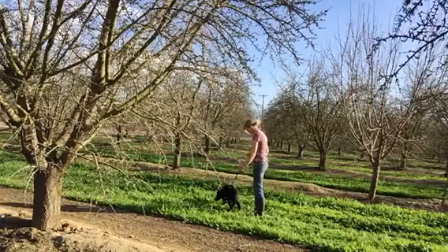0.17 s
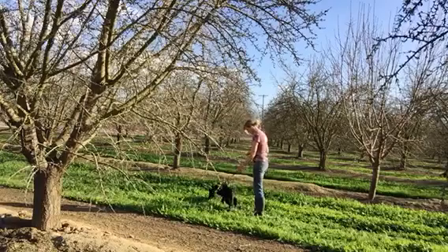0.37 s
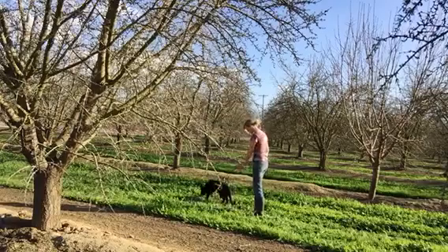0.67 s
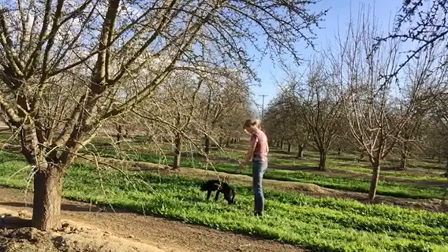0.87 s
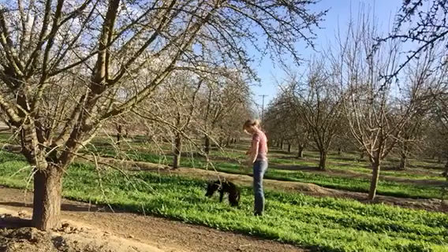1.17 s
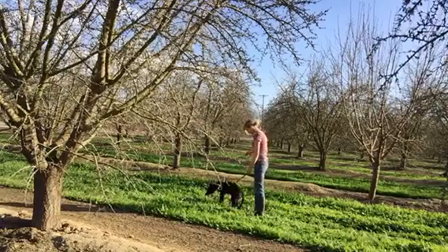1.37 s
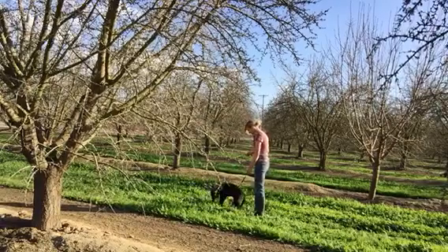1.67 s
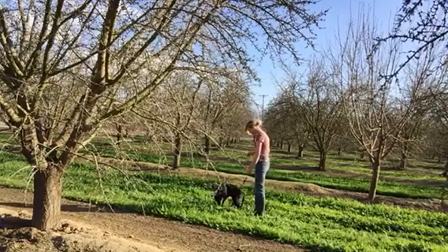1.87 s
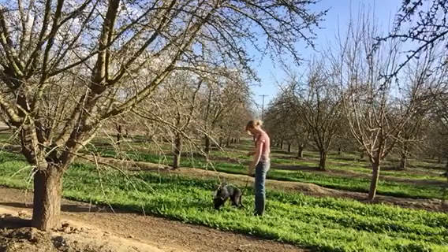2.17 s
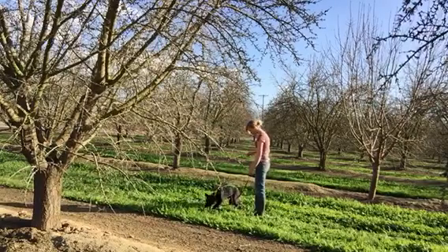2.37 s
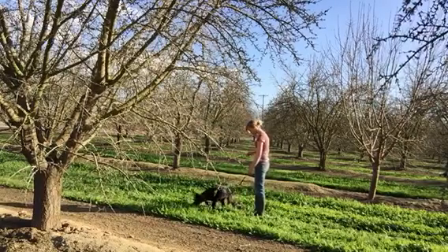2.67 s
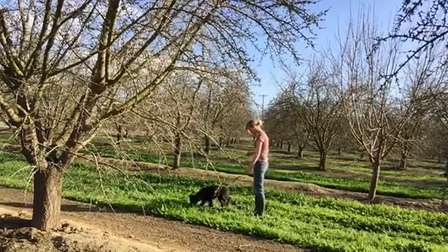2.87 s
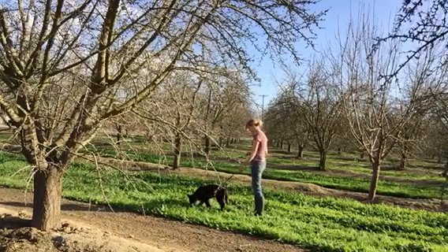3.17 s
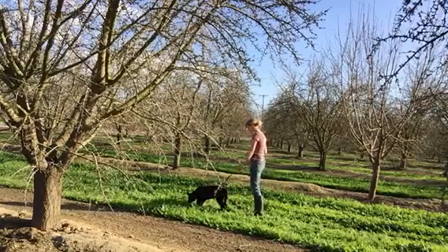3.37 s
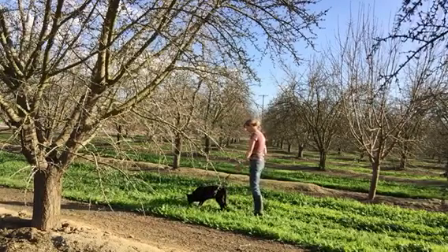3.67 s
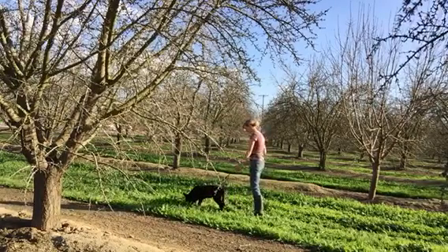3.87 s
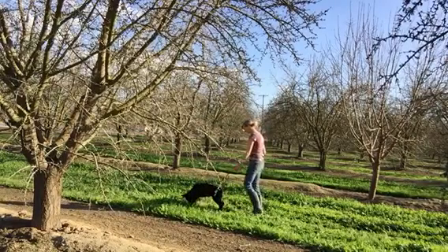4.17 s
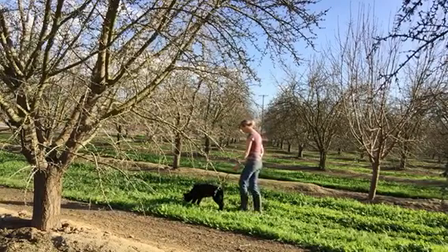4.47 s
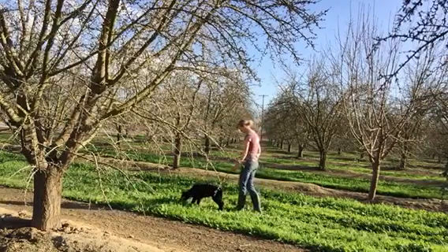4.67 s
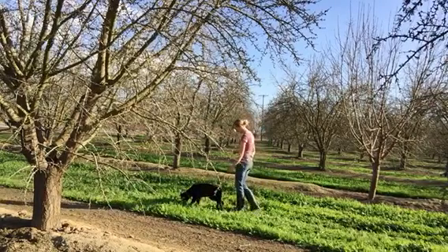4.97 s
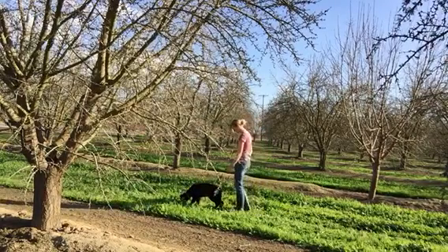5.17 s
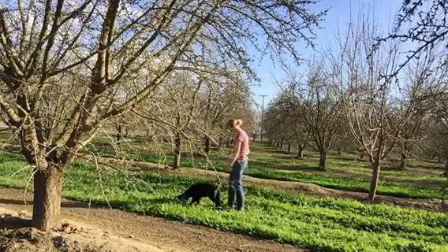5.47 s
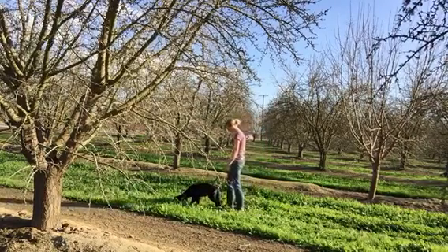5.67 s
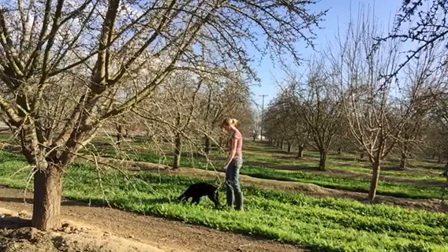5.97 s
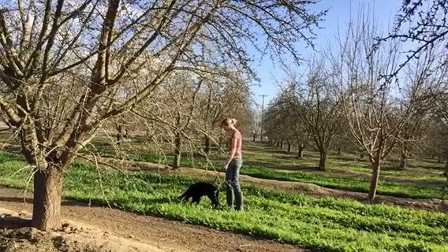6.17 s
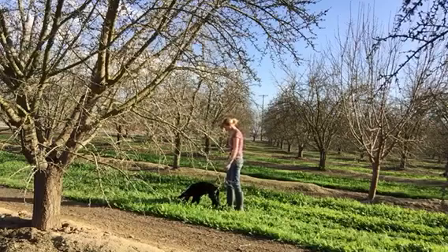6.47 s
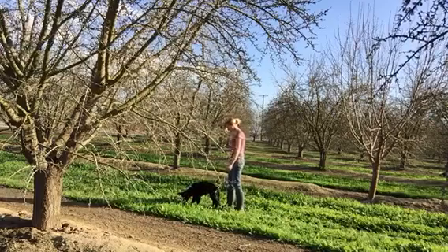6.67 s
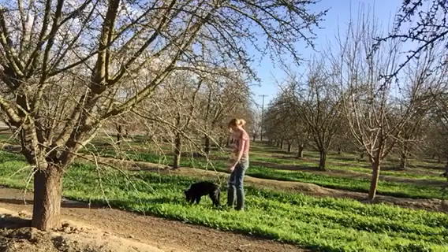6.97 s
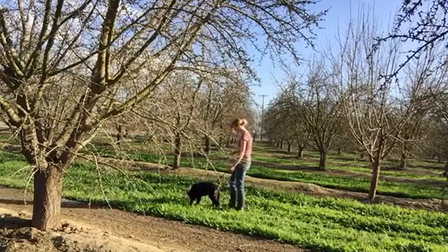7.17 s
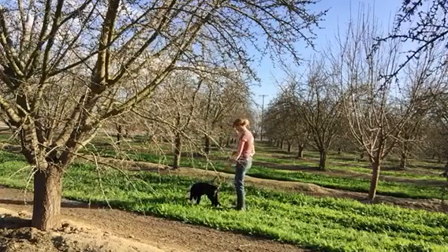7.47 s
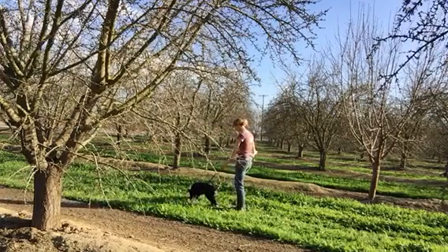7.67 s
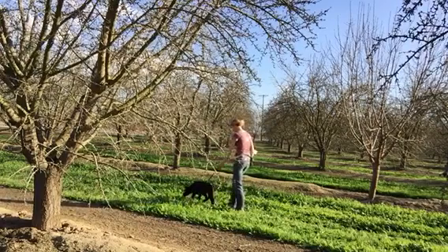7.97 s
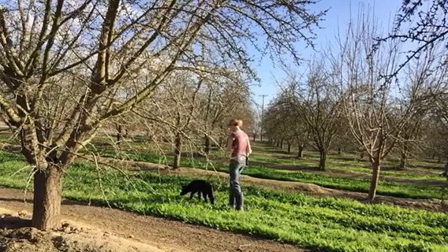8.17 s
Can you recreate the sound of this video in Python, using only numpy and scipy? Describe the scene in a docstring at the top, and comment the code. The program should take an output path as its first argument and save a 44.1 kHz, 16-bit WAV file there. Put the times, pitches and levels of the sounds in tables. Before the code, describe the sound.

Deep exhaust hum of a passing vehicle rises, shifts down in pitch, washes by with tyre roar, and recedes over faint outdoor air.

```python
"""An orchard, with an eight-cylinder vehicle driving past some way off: sines locked to the firing rate make
its exhaust drone, which drops in pitch at a gear change, as it passes, and at a second change near the end.
Coloured noise makes the exhaust gas, tyres and rumbling wake, which swell and slowly fade; a moving filter
hollows the vehicle's sound as its ground reflection does. Over steady faint air noise, short swishes of noise
rustle in the grass and gliding sines chirp like small birds far away."""
import sys
import numpy as np
from scipy import signal
from scipy.fft import rfft, irfft, next_fast_len
from scipy.io import wavfile

SR = 44100
rng = np.random.default_rng(int(sys.argv[2]) if len(sys.argv) > 2 else 0)


def generate_wav(sig):
    """Save sig (samples, or channels by samples) to the path in sys.argv[1] as 16-bit PCM at SR."""
    pcm = np.round(np.clip(np.atleast_2d(sig).T, -1, 1) * 32767).astype(np.int16)
    wavfile.write(sys.argv[1], SR, pcm)


N = 366206
TIME = np.arange(N) / SR


def from_db(db):
    """Decibels to gain."""
    return 10 ** (np.asarray(db) / 20)


def rms_one(x):
    """Scale to unit rms."""
    return x / np.sqrt(np.mean(x ** 2) + 1e-20)


def in_time(rows):
    """Each column of a curve table, sample by sample."""
    s, *columns = np.transpose(rows)
    return [np.interp(TIME, s, column) for column in columns]


def drift(rate_hz, step=40):
    """Smooth random wander of spread 1: noise through two equal poles, run once every few samples."""
    pole = np.exp(-2 * np.pi * rate_hz * step / SR)
    raw = rng.standard_normal(N // step + 2002)
    slow = signal.lfilter([1], [1, -2 * pole, pole * pole], raw)[2000:]  # drop the run-in
    return np.interp(np.arange(N) / step, np.arange(len(slow)), rms_one(slow))


def noise(spectrum):
    """Steady noise of a given colour, rms 1, falling 12 dB per octave outside the spectrum's ends."""
    size = next_fast_len(N)
    hz = np.maximum(np.arange(size // 2 + 1) * SR / size, 1)
    points_hz, points_db = np.transpose(spectrum)
    gain = from_db(np.interp(np.log(hz), np.log(points_hz), points_db))
    skirts = np.minimum(1, hz / points_hz[0]) ** 2 * np.minimum(1, points_hz[-1] / hz) ** 2
    white = rfft(rng.standard_normal(size))
    return rms_one(irfft(white * gain * skirts, size)[:N])


def bell(s, half_s, order=2):
    """A smooth bump of height 1, down to 1/e at half_s; a higher order flattens its top."""
    return np.exp(-np.minimum(np.abs((TIME - s) / half_s) ** order, 20))


# rounding of the corner from rise to fade; sound scattered by the orchard, relative to the corner level
ROUNDING_S, SCATTER_DB = 0.25, -22


def passing(corner_s, corner_db, rise_db_per_s, fade_db_per_s):
    """Level in dB: two slopes, approach and fade, meet in a rounded corner over a floor of scattered sound."""
    late = (TIME - corner_s) / ROUNDING_S
    rise_db = rise_db_per_s * np.logaddexp(0, -late)
    fade_db = fade_db_per_s * np.logaddexp(0, late)
    direct = from_db(-ROUNDING_S * (rise_db + fade_db))
    return corner_db + 20 * np.log10(np.hypot(direct, from_db(SCATTER_DB)))


def recede(x, edge_hz, loss_db, start_s, end_s):
    """The top of a sound dulls as the vehicle draws away and the air between grows longer."""
    low = signal.sosfiltfilt(signal.butter(4, edge_hz, fs=SR, output="sos"), x)
    return low + (x - low) * from_db(np.interp(TIME, [start_s, end_s], [0, loss_db]))


# engine abreast; its speed over that of sound; its distance over its speed
ABREAST_S, MACH, SWEEP_S = 2.15, 0.056, 0.38


def doppler():
    """Pitch factor: above 1 on the approach, sweeping below 1 as the engine goes by."""
    along = (TIME - ABREAST_S) / SWEEP_S
    return 1 - MACH * along / np.hypot(along, 1)


# Engine speed through the gears, before Doppler. Each row: time in seconds, firings per second.
FIRING_RATE = [(0, 160.6), (0.6, 165.2), (1.38, 168.9), (1.84, 141.2), (4.55, 141.2), (7.75, 150.4),
               (8.1, 150), (8.28, 135.5)]


def firing_phase():
    """Heard firing rate in Hz, and its running phase in radians."""
    speed_hz, = in_time(FIRING_RATE)
    firing_hz = speed_hz * doppler()
    return firing_hz, 2 * np.pi * np.cumsum(firing_hz) / SR


# Drone level. Each row: time in seconds, rms level in dB before waver.
DRONE_LEVEL = [(0.03, -39), (0.19, -38), (0.26, -40.5), (0.35, -36), (1.04, -29.5), (1.34, -34),
               (1.68, -24), (2.02, -28.5), (2.05, -30.5), (2.3, -22), (3.04, -25), (3.82, -23),
               (4.04, -24.5), (4.25, -23), (6.48, -28.5), (7.07, -27.5), (8.13, -34.5), (8.27, -33.5)]


def drone(phase, waver_db):
    """The muffler passes the firing rate as a near sine."""
    level_db, = in_time(DRONE_LEVEL)
    return np.sqrt(2) * np.sin(phase) * from_db(level_db + waver_db * drift(12))


# gear change, where the unloaded engine booms: moment, half length, lift of the slow lines
SHIFT_S, BOOM_HALF_S, BOOM_DB = 1.4, 0.37, 17.5
# Slow engine lines. Each row: order in eighths of the firing rate, level in dB against the gas flow.
LOPING_LINES = [(4, -16.5), (6, -7.5), (10, -20)]


def lope(phase, flow_db):
    """The engine lopes in wavering lines around the firing rate, booming at the gear change."""
    boom_db = flow_db + BOOM_DB * bell(SHIFT_S, BOOM_HALF_S)
    out = 0
    for order, line_db in LOPING_LINES:
        line = np.sqrt(2) * np.sin(phase * round(order) / 8 + .5 * drift(8))
        out = out + line * from_db(boom_db + line_db + 2 * drift(8))
    return out


# hard pull before the gear change: moment, half length, mean level
PULL_S, PULL_HALF_S, SNARL_DB = 0.54, 0.57, -53


def snarl(phase):
    """Pulling hard, the exhaust snarls at twice the firing rate."""
    line = np.sqrt(2) * np.sin(2 * phase + .5 * drift(8))
    return line * from_db(SNARL_DB + 2 * drift(9.9)) * bell(PULL_S, PULL_HALF_S, order=4)


# Uneven-cylinder lines. Each row: order in eighths of the firing rate, relative level in dB.
UNEVEN_LINES = [(7, -3.5), (9, -10), (10, -13), (11, -3.5), (12, 3), (14, -0.5), (16, 11.5), (24, -0.5)]
# Muffler response. Each row: frequency in Hz, gain in dB.
MUFFLER_GAIN = [(100, -9.5), (133, 2), (150, -1), (200, -4), (260, -16.5), (310, -23.5), (350, -20.5),
                (400, -21)]


def burble(firing_hz, phase, unsteady):
    """Unequal cylinders add lines at eighths of the firing rate; each swells near the muffler resonance."""
    out = 0
    for order, line_db in UNEVEN_LINES:
        multiple = round(order) / 8
        turn = multiple * phase + rng.uniform(0, 2 * np.pi)
        muffler_db = np.interp(multiple * firing_hz, *np.transpose(MUFFLER_GAIN))
        waver = drift(5.6) * np.sin(turn) + drift(3.2) * np.cos(turn)
        out = out + from_db(line_db + muffler_db) * (np.sin(turn) + unsteady * waver)
    return out


# Gas rush spectrum. Each row: frequency in Hz, relative density in dB per Hz.
RUSH_SPECTRUM = [(50, -12.5), (80, 4.5), (150, 7.5), (230, -1), (320, 0), (400, -4), (500, -11),
                 (700, -19.5), (1200, -47)]


def gas(phase, puff):
    """Gas leaves in a puff with every firing."""
    rush = recede(noise(RUSH_SPECTRUM), edge_hz=270, loss_db=-12.5, start_s=4.36, end_s=9.0)
    return rush * (1 + puff * np.sin(phase))


# throttle eased for the gear change: half length, drop of the gas flow
EASE_HALF_S, EASE_DB = 0.27, -6.5


def exhaust(uneven_db, unsteady, waver_db, rush_db, puff):
    """Tones locked to the firing rate, with burble and gas that follow the eased throttle."""
    firing_hz, phase = firing_phase()
    # the tailpipe points backwards, so its gas is loudest well after the pass
    flow_db = passing(corner_s=3.45, corner_db=-44.0, rise_db_per_s=2.5, fade_db_per_s=3.0)
    eased_db = flow_db + EASE_DB * bell(SHIFT_S, EASE_HALF_S)
    tones = drone(phase, waver_db) + lope(phase, flow_db) + snarl(phase)
    rough = from_db(uneven_db) * burble(firing_hz, phase, unsteady) + from_db(rush_db) * gas(phase, puff)
    return tones + from_db(eased_db) * rough


# closest, in clear view: moment, half length
PASS_S, PASS_HALF_S = 2.268, 0.36
# Tyre roar, tread hum, hiss and grit spray spectra. Each row: frequency in Hz, relative density in dB per Hz.
ROAR_SPECTRUM = [(300, -10.5), (500, -2.5), (750, -0.5), (1000, 2), (1300, -5), (1800, -11.5), (3000, -38)]
TREAD_SPECTRUM = [(800, -27), (1200, -1.5), (1550, 2), (2000, 0.5), (2450, -4), (3000, -12), (4500, -40.5)]
HISS_SPECTRUM = [(1900, -18), (2600, 1.5), (3200, 0.5), (3800, -2), (4400, -7), (5200, -24), (7000, -39)]
SPRAY_SPECTRUM = [(2500, -14.5), (4000, 0), (5500, 2), (6800, -1), (8000, -10.5), (10000, -18.5),
                  (14000, -28)]


def tyres(flutter_db):
    """Tread roar, hum and hiss, with a spray of grit; each jumps in clear view, and the air makes them flutter."""
    def part(sound, level_db, view_db):
        """One noise on its approach and fade, lifted at the pass."""
        lift_db = view_db * bell(PASS_S, PASS_HALF_S, order=4)
        return sound * from_db(level_db + lift_db + flutter_db * drift(14))

    roar_db = passing(corner_s=4.16, corner_db=-47.0, rise_db_per_s=3.0, fade_db_per_s=7.0)
    hum_db = passing(corner_s=5.2, corner_db=-50.0, rise_db_per_s=1.16, fade_db_per_s=12.0)
    hiss_db = passing(corner_s=3.17, corner_db=-60.0, rise_db_per_s=4.0, fade_db_per_s=7.0)
    spray_db = passing(corner_s=2.68, corner_db=-70.0, rise_db_per_s=3.5, fade_db_per_s=5.0)
    hum = recede(noise(TREAD_SPECTRUM), edge_hz=1920, loss_db=-13.0, start_s=3.98, end_s=5.65)
    return (part(noise(ROAR_SPECTRUM), roar_db, view_db=11.0)
            + part(hum, hum_db, view_db=3.5)
            + part(noise(HISS_SPECTRUM), hiss_db, view_db=5.0)
            + part(noise(SPRAY_SPECTRUM), spray_db, view_db=11.5))


# Tyre noise swells and dips on its way through the trees. Each row: middle in seconds, half length in
# seconds, centre in Hz, width in octaves, lift in dB.
TREE_SURGES = [(.55, 0.66, 1950, 1.5, 3), (1.657, 0.41, 1506, 3, -3), (3.177, 0.16, 2860, 1.12, 7.5),
               (3.72, 0.19, 3900, 1.1, -6.5), (3.98, 0.16, 6350, 0.87, 6.5), (4.36, .18, 3720, 0.79, 5),
               (5.555, .1, 1406, 0.56, 4), (5.968, 0.18, 1772, 1.1, -3.5), (6.35, 0.22, 682, 1.4, -8),
               (6.373, 0.23, 1720, 1.6, 5), (6.758, 0.14, 850, 0.92, 4.5), (7.05, 0.098, 1096, 1.2, 2.5)]


def surges(x):
    """Each swell or dip changes one broad band of the sound for a moment."""
    out = x.copy()
    for s, half_s, centre_hz, octaves, lift_db in TREE_SURGES:
        near = np.abs(TIME - s) < 3 * half_s
        edges_hz = np.minimum(centre_hz * 2 ** (octaves * np.array([-.5, .5])), SR / 2 - 1)
        band_filter = signal.butter(1, edges_hz, "band", fs=SR, output="sos")
        band = signal.sosfiltfilt(band_filter, out[near])
        out[near] += band * (from_db(lift_db * bell(s, half_s)[near]) - 1)
    return out


def trunks(x, share, wander_s, count=10):
    """Weak reflections off the tree rows, their delays wandering, ripple the colour."""
    delays = [rng.uniform(.003, .025) + wander_s * drift(.5) for _ in range(count)]
    return x + share * sum(np.interp(TIME - delay, TIME, x) for delay in delays)


# Wake rumble spectrum. Each row: frequency in Hz, relative density in dB per Hz.
RUMBLE_SPECTRUM = [(22, -17), (38, -5.5), (60, -3), (90, -5.5), (140, -10), (300, -38)]
# Gusts in the wake. Each row: middle in seconds, half length in seconds, lift in dB.
WAKE_GUSTS = [(2.488, .07, 8), (3.203, .13, 6), (3.643, 0.18, 9), (4.33, .1, 5), (5.497, .17, 3)]


def rumble(lumpy_db):
    """Stirred air rumbles in uneven lumps: a few gusts after the pass, on a long wake."""
    wake_db = passing(corner_s=5.1, corner_db=-47.5, rise_db_per_s=3.0, fade_db_per_s=2.0)
    gust_db = sum(lift_db * bell(s, half_s) for s, half_s, lift_db in WAKE_GUSTS)
    return noise(RUMBLE_SPECTRUM) * from_db(wake_db + gust_db + lumpy_db * drift(7))


# Ground reflection, a lift nearby and a cancellation further off. Each row: time in seconds, centre in Hz,
# lift in dB.
GROUND_REFLECTION = [(0, 517, -16), (1.3, 517, -9), (2.0, 685, 4), (3.55, 790, 4.5), (4.7, 731, -16),
                     (6.0, 708, -12.5), (7.4, 675, -5)]


def ground(x, width, block=256):
    """A broad dip or lift that moves with the path difference between direct and reflected sound."""
    centre_hz, lift_db = in_time(GROUND_REFLECTION)
    out, state = np.zeros(N), np.zeros(2)
    for i in range(0, N, block):
        w = 2 * np.pi * centre_hz[i] / SR
        g = from_db(lift_db[i] / 2)  # half in the zeros, half in the poles
        k = np.sin(w) * width / 2
        b = [1 + k * g, -2 * np.cos(w), 1 - k * g]
        a = [1 + k / g, -2 * np.cos(w), 1 - k / g]
        out[i:i + block], state = signal.lfilter(b, a, x[i:i + block], zi=state)
    return out


# Open air spectrum. Each row: frequency in Hz, relative density in dB per Hz.
AIR_SPECTRUM = [(100, 9), (1000, 2), (3000, 0.5), (6500, 1.5), (8500, -1), (10500, -5.5), (15000, -4.5)]


def air(level_db):
    """Steady faint noise of the open air."""
    return from_db(level_db) * noise(AIR_SPECTRUM)


# Rustles. Each row: middle in seconds, half length in seconds, level in dB.
GRASS_RUSTLES = [(.975, 0.035, -68), (1.566, .006, -71), (1.614, .02, -70), (5.41, .06, -78),
                 (5.56, 0.054, -80), (5.893, 0.035, -78.5), (7.952, 0.015, -73), (8.157, 0.14, -78.5)]
# Grass spectrum. Each row: frequency in Hz, relative density in dB per Hz.
GRASS_SPECTRUM = [(2000, -14.5), (4000, -3.5), (6200, 2), (9000, -1.5), (15000, -10.5)]


def grass(grain_db):
    """Blades brush each other in short grainy swishes."""
    swish = sum(from_db(level_db) * bell(s, half_s) for s, half_s, level_db in GRASS_RUSTLES)
    return swish * rms_one(noise(GRASS_SPECTRUM) * from_db(grain_db * drift(200)))


# Chirps. Each row: middle in seconds, length in seconds, mid pitch in Hz, rise from end to end in octaves,
# scoop in octaves per length squared, peak level in dB.
BIRD_CHIRPS = [(1.07, .058, 3860, .12, 0.84, -61), (1.352, .03, 3800, .2, .3, -65),
               (4.87, .055, 3650, .3, 0.4, -68), (5.209, .02, 5950, 0, -0.52, -65),
               (6.274, 0.038, 3720, .15, .1, -69), (6.343, .06, 2950, .18, -.2, -67),
               (7.694, 0.029, 3680, -.02, .25, -68.5)]


def birds():
    """Short whistles whose pitch scoops as it glides."""
    out = np.zeros(N)
    for s, length_s, hz, rise, scoop, level_db in BIRD_CHIRPS:
        u = np.linspace(-.5, .5, int(length_s * SR))
        pitch_hz = hz * 2 ** (rise * u + scoop * u ** 2)
        whistle = np.cos(np.pi * u) * np.sin(2 * np.pi * np.cumsum(pitch_hz) / SR)
        start = int((s - length_s / 2) * SR)
        out[start:start + len(u)] += from_db(level_db) * whistle
    return out


def scene():
    """The vehicle heard over open ground, with the quiet orchard around."""
    engine = exhaust(uneven_db=1.5, unsteady=0.6, waver_db=0.26, rush_db=6.0, puff=0.15)
    road = trunks(surges(tyres(flutter_db=1.5)), share=.09, wander_s=.0004)
    wake = rumble(lumpy_db=3.0)
    orchard = air(level_db=-77.5) + grass(grain_db=0.5) + birds()
    return (ground(engine + road + wake, width=0.24) + orchard)[None]


CUTOFF_HZ = 15100


def record(dry):
    """The top is cut steeply."""
    return signal.sosfilt(signal.ellip(10, .1, 90, CUTOFF_HZ, fs=SR, output="sos"), dry)


dry = scene()
out = record(dry)
generate_wav(out)
```